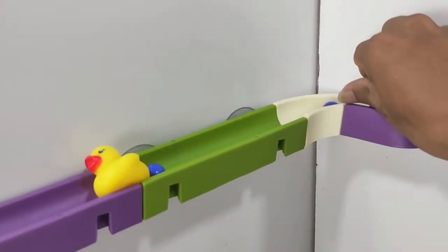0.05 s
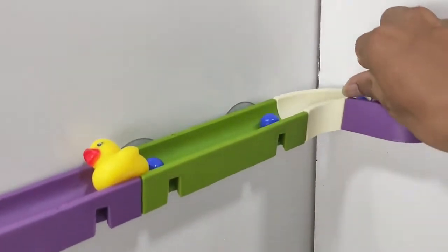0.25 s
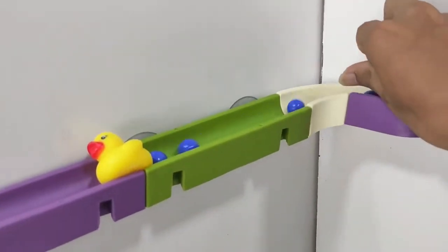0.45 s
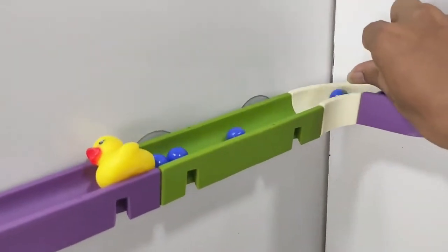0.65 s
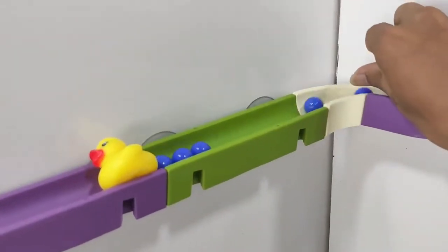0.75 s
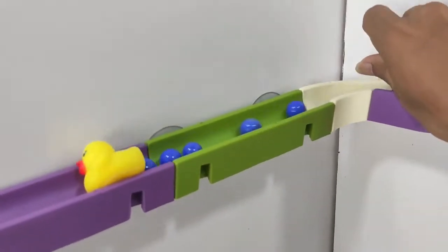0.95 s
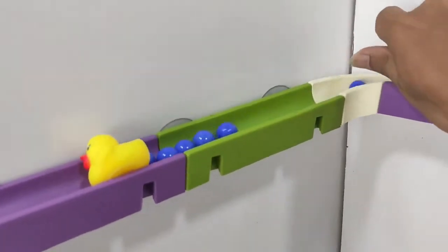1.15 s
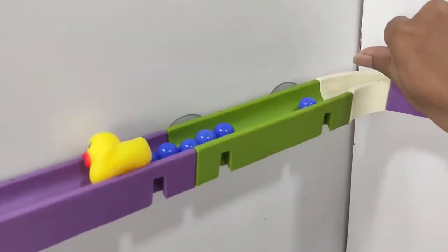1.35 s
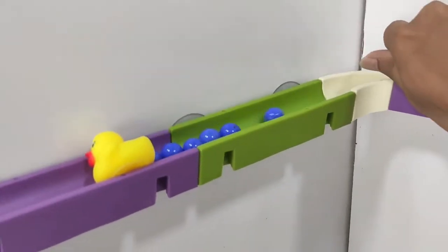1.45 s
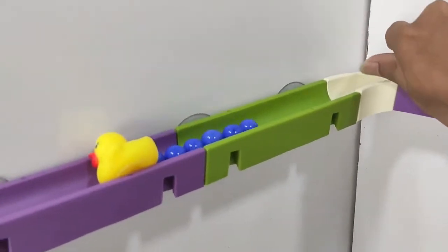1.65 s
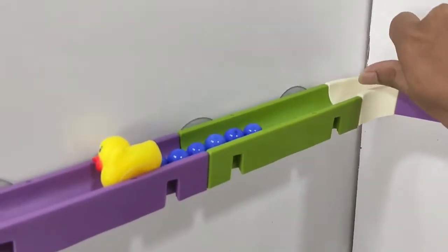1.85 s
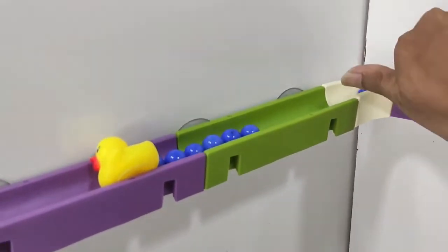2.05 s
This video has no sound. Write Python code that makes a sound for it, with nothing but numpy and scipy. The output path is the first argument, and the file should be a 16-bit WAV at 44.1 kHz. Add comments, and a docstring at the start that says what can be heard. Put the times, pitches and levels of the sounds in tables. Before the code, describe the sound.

Marbles rumble along a plastic chute and click against each other, with a short indoor echo.

```python
"""In a small, hard room, glass marbles run one by one down a plastic toy track stuck to a wall.
Over a low hum, they rumble along the chute, clack against the marbles waiting behind a toy duck
and knock into the bend, which makes the plastic ring. Early on the track groans under a hand;
later the row of marbles shoves the duck with a soft thud. The room echoes each knock and clack."""
import sys
import numpy as np
from scipy import signal
from scipy.fft import rfft, irfft, next_fast_len
from scipy.io import wavfile
from scipy.ndimage import map_coordinates

SR = 44100
rng = np.random.default_rng(int(sys.argv[2]) if len(sys.argv) > 2 else 0)


def master_out(mix):
    """Clip the mix to full scale and print it as 16-bit PCM to the path in sys.argv[1]."""
    frames = np.transpose(np.atleast_2d(mix))
    ceiling = np.clip(frames, -1, 1)
    pcm = np.round(ceiling * 32767).astype(np.int16)
    wavfile.write(sys.argv[1], SR, pcm)


N = 92610
TIME = np.arange(N) / SR  # seconds into the scene
HIT_TIME = np.arange(SR * 3 // 4) / SR  # seconds since a hit


def amp(db):
    return 10 ** (np.asarray(db) / 20)


def unit_rms(x):
    return x / np.sqrt(np.mean(x ** 2) + 1e-20)


def unit_energy(x):
    return unit_rms(x) / np.sqrt(x.shape[-1])


def along(points, hz):
    """Read a curve of (Hz, value) points, with octaves evenly spaced."""
    point_hz, values = np.transpose(points)
    return np.interp(np.log(hz + 1), np.log(point_hz + 1), values)


def bell(hz, centre_hz, width_hz):
    """A resonance: a hump of height 1 around one pitch."""
    return 1 / (1 + ((hz - centre_hz) / width_hz) ** 2)


def add(out, start_s, x):
    """Mix x into out at a given time."""
    i = max(round(start_s * SR), 0)
    out[:, i:i + x.shape[1]] += x[:, :N - i]


def coloured(x, gain_db):
    """Turn each frequency of x up or down by gain_db(Hz)."""
    size = 2 * next_fast_len(x.shape[-1] // 2 + 2048)
    cepstrum = irfft(np.log(amp(gain_db(np.fft.rfftfreq(size, 1 / SR)))), size)
    cepstrum[..., 1:size // 2] *= 2  # folded so that nothing rings before a hit
    cepstrum[..., size // 2 + 1:] = 0
    return irfft(rfft(x, size) * np.exp(rfft(cepstrum)), size)[..., :x.shape[-1]]


def paired(x):
    """Blend two unrelated signals as two close microphones hear them: alike in the bass."""
    # How alike left and right are. Each row: frequency in Hz, likeness (1 is identical).
    likeness = [(100, 0.91), (350, 0.79), (700, 0.7), (1300, 0.06), (4000, 0.037)]
    hz = np.fft.rfftfreq(x.shape[1], 1 / SR)
    angle = np.arccos(np.clip(along(likeness, hz), -1, 1)) / 2
    mid, side = irfft(rfft(x) * [np.cos(angle), np.sin(angle)], x.shape[1])
    return np.array([mid + side, mid - side])


def noise(samples=len(HIT_TIME)):
    return paired(rng.standard_normal((2, samples)))


def wobble(per_s):
    """A smooth curve through per_s random values a second."""
    return map_coordinates(rng.standard_normal(int(N * per_s / SR) + 4), [TIME * per_s])


def room_tone():
    """Low, steady noise with a wavering hum."""
    # The background noise. Each row: frequency in Hz, gain in dB.
    air_colour = [(40, -36), (62, -3), (110, -1), (180, 0), (300, -8), (700, -7), (1500, -15),
                  (3000, -29.5), (8000, -36), (15000, -48)]
    # The tones of the hum. Each row: pitch in Hz, level in dB.
    hum_tones = [(82, -52.5), (112, -53.5), (146.5, -51)]
    air = unit_rms(coloured(noise(N), lambda hz: along(air_colour, hz)))
    hum = sum(amp(db + 2.8 * wobble(4.59)) * np.sqrt(2)
              * np.sin(2 * np.pi * hz * TIME + 0.62 * wobble(4.1)) for hz, db in hum_tones)
    return amp(-43.5) * air + hum


def rolling():
    """Tiny bumps shake the track and fill the room; the ringing shifts as the marbles travel."""
    # The rumble's loudness. Each row: time in seconds, level in dB.
    loudness = [(0, -32.5), (.1, -43), (.22, -46.5), (.3, -29), (.46, -34.5), (.56, -30.5), (.7, -33),
                (.85, -31), (1.0, -30), (1.35, -32.5), (1.5, -41), (1.61, -36), (1.72, -49.5),
                (1.85, -36.5), (2.1, -44.5)]
    # The tone of the chute. Each row: frequency in Hz, gain in dB.
    chute_colour = [(80, -13.5), (280, -11.5), (380, 2), (490, -6.5), (700, -1.5), (950, -0.5), (1400, 2.5),
                    (2200, -11), (4000, -10.5), (6500, -23.5), (10000, -20.5), (15000, -49)]
    # Soft rolling stirs mainly the track's low notes. Each row: frequency in Hz, gain in dB.
    ring_tilt = [(420, -1), (700, -4.5), (1500, -6), (2400, -16)]
    bumps_per_s, spread_db, echo_db = 400, 5.5, -1
    bumps = (rng.random((2, N)) < bumps_per_s / SR) * np.sign(rng.standard_normal((2, N)))
    bumps *= amp(spread_db * np.minimum(rng.standard_normal((2, N)), 2))
    shake = lambda response: signal.fftconvolve(bumps[:1], response, axes=1)[:, :N]
    rumble = paired(bumps) + amp(echo_db) * shake(room_echo())
    rumble = unit_rms(coloured(rumble, lambda hz: along(chute_colour, hz)))
    places = np.array([wobble(10) for _ in range(3)])  # drifting shares of three spots on the track
    ring = sum(share * shake(track_ring()) for share in places / np.linalg.norm(places, axis=0))
    ring = unit_rms(coloured(ring, lambda hz: along(ring_tilt, hz)))
    level_db = np.interp(TIME, *np.transpose(loudness)) + wobble(38.16)
    return amp(level_db) * unit_rms(rumble + ring)


def room_echo():
    """The hard walls throw sound back; the treble dies first."""
    # The echo's length. Each row: frequency in Hz, seconds to fade by 60 dB.
    fade_times = [(150, 0.56), (500, 0.54), (1400, 0.52), (3700, 0.46), (9000, 0.4), (15000, 0.31)]
    hz, t, spectrum = signal.stft(rng.standard_normal((2, len(HIT_TIME))), SR, nperseg=256)
    fade = amp(-60 * t / along(fade_times, hz)[:, None])
    tail = signal.istft(spectrum * fade, SR, nperseg=256)[1][:, :len(HIT_TIME)]
    build_up = 1 - np.exp(-HIT_TIME / 0.0039)
    return unit_energy(paired(tail) * build_up)


def track_ring():
    """The track rings at its own notes, in a new balance for each spot touched."""
    # The track's notes. Each row: pitch in Hz, relative level in dB, seconds to fade by 60 dB.
    notes = [(349.8, -1.5, 0.24), (425.3, -1, 0.16), (574, 0, 0.13), (723, 1, 0.22), (789, -4.5, 0.14),
             (1208, 3.5, 0.24), (1233, 3, 0.099), (1408, -0.5, 0.14), (1482, 4, 0.078), (1638, 7.5, 0.15),
             (2000, -4, 0.28), (2318, 1.5, 0.12), (2348, 5, 0.19), (2626, -10, 0.51)]
    scatter_db = 1.8
    ring = sum(amp(db + scatter_db * rng.standard_normal() - 60 * HIT_TIME / fade_s)
               * np.sin(2 * np.pi * (hz * HIT_TIME + rng.random((2, 1)))) for hz, db, fade_s in notes)
    return unit_energy(paired(ring))


def contact(burst, colour_db, left_db, echo_db):
    """One hit: a filtered burst, placed left or right, and its duller echo."""
    # The walls swallow the highest treble. Each row: frequency in Hz, gain in dB.
    dulling = [(9000, -0.5), (12000, 0.5), (15500, -5.5)]
    direct = unit_energy(coloured(burst, colour_db) * amp([[left_db / 2], [-left_db / 2]]))
    echo = unit_energy(coloured(room_echo(), lambda hz: colour_db(hz) + along(dulling, hz)))
    return direct + amp(echo_db) * echo


def clacks():
    """Glass meets glass: a sharp click with a tiny ping that runs through the row of marbles."""
    # Marble hits marble. Each row: start in seconds, relative level in dB, seconds before fading,
    # ping pitch in Hz, boost at that pitch in dB, left over right in dB.
    hits = [(.008, -24, 0.0003, 8270, 3.5, -2), (0.5778, -13, 0.0018, 8470, 7.5, -7),
            (0.8393, -11, 0.001, 8950, 8, -14), (0.8411, -17, 0.0023, 9200, 4, -12),
            (1.1, -26, 0.0018, 8740, 13, -3), (1.118, -25, 0.0013, 8800, 7, -3),
            (1.1743, -6, 0.0016, 9120, 5.5, -6), (1.2629, -10.5, 0.00053, 8900, 10.5, -17),
            (1.264, -5.5, .0018, 8820, 9.5, -1.5), (1.6256, -9, 0.00094, 8360, 7, -1)]
    # The tone of glass. Each row: frequency in Hz, gain in dB.
    glass = [(200, -7), (400, -14.5), (1400, -7.5), (3000, -14), (5000, -3), (6600, -1.5), (9500, 2),
             (12000, -1), (15000, -15)]
    ping_db, fade_s = -9, 0.003
    out = np.zeros((2, N))
    for start_s, db, hold_s, ping_hz, boost_db, left_db in hits:
        ping = np.sqrt(2) * np.sin(2 * np.pi * ping_hz * HIT_TIME + np.array([[np.pi / 2], [0]]))
        fade = amp(-60 * np.maximum(HIT_TIME - hold_s, 0) / fade_s)
        burst = (noise() + amp(ping_db) * ping) * fade
        colour = lambda hz: along(glass, hz) + boost_db * bell(hz, ping_hz, width_hz=480)
        add(out, start_s, 10 * amp(db) * contact(burst, colour, left_db, echo_db=-3.5))
    return out


def knocks():
    """A marble strikes plastic: a snap, a rattle that differs from spot to spot, and the track's ring."""
    # Marble hits track. Each row: start in seconds, relative level in dB, treble in dB, body in dB,
    # thin side wall's pitch in Hz, boost at that pitch in dB, ring and echo in dB, left over right in dB.
    hits = [(.081, -24, -18, 1.5, 3240, 1.5, -3.5, -6), (.134, -33, 13, 7, 4000, 0, 1.5, -16),
            (0.2388, -10.5, 7.5, 2, 4470, 2, 0.5, 0.5), (.2524, -8, 3.5, 3.5, 3220, -5, -2.5, -2),
            (.304, -13.5, -1.5, -17, 3570, 2, .5, -1), (0.3324, -12.5, -2, 3, 3940, 9.5, -2, 2),
            (0.3408, -9, -5, -3, 3860, 12.5, -10.5, 0), (.487, -22.5, -12.5, 2.5, 3400, -25, 1, 0),
            (.505, -21, -9, -1, 3420, -24, -4.5, -8), (.577, -17.5, 0, 4, 2380, -0.5, -7.5, -1),
            (0.6367, -7.5, -5.5, -3.5, 3300, 3, 0, 2.5), (0.6803, -12, 7, 1, 4270, 2, -.5, -2.5),
            (.718, -13.5, -2.5, 1, 4160, 3, -1.5, -6), (.885, -18, -9, 7.5, 3500, -5, -4, 2.5),
            (0.993, -20, -31, 5, 3500, -15, -1, -2), (1.013, -18.5, -15, 8, 4140, 8, -6.5, 0),
            (1.07, -27.5, -10, -16, 3350, -11, 3, -5), (1.084, -18.5, -13, 4, 3180, -12, 0, -4),
            (1.339, -25.5, -21, 3, 3700, 4, 3, 3), (1.366, -18.5, 6.5, 10, 3950, 12, -6, -.5),
            (1.577, -31.5, -3, 6, 3600, 1, 1, 1), (1.762, -15.5, -4.5, -5, 3500, 5.5, -5.5, -4),
            (1.7875, -7.5, 0, -2, 3850, 5.5, 0, 2.5)]
    # The tone of the plastic shell. Each row: frequency in Hz, gain in dB.
    plastic = [(60, -29), (220, -5.5), (360, -3.5), (800, -1.5), (1450, 2.5), (2500, -1), (4200, -3.5),
               (6300, -10.5), (7700, -14), (9200, -7.5), (12000, -10.5), (15000, -24)]
    fade_s, snap_height, ring_db = 0.021, 4.7, -3
    shell_hz = np.arange(0, SR / 2, 170)  # the shell has a random peak or dip at each of these
    out = np.zeros((2, N))
    for start_s, db, treble_db, body_db, wall_hz, wall_db, after_db, left_db in hits:
        burst = noise() * amp(-60 * HIT_TIME / fade_s)
        burst[[0, 1], [4, 0]] += snap_height  # reaches the left side 4 samples late
        ripple_db = 2.5 * np.sign(rng.standard_normal(len(shell_hz)))
        colour = lambda hz: (along(plastic, hz)
                             + along([(250, 0), (800, body_db), (3000, 0), (8500, treble_db)], hz)
                             + wall_db * bell(hz, wall_hz, width_hz=500)
                             + np.interp(hz, shell_hz, ripple_db))
        ring = amp(ring_db + after_db) * track_ring()
        add(out, start_s, 10 * amp(db) * (contact(burst, colour, left_db, echo_db=after_db) + ring))
    return out


def track_groan():
    """The track flexes under the hand: a low tone that swells quickly and fades."""
    start_s, length_s, pitch_hz, level_db = 0.11, 0.19, 109.1, -40
    progress = np.clip((TIME - start_s) / length_s, 0, 1)
    swell = np.sin(np.pi * progress ** 0.36)
    tone = np.sqrt(2) * np.sin(2 * np.pi * pitch_hz * TIME + 0.52 * wobble(25))
    return amp(level_db) * swell * tone


def duck_thud():
    """The row of marbles shoves the toy duck: a soft, low bump."""
    start_s, level_db, rise_s, fade_s = 1.172, -29.5, 0.0033, 0.079
    colour = lambda hz: 40 * np.log10(bell(hz, centre_hz=230, width_hz=110) + 0.001)
    low_noise = unit_rms(coloured(noise(), colour))
    envelope = amp(level_db - 60 * HIT_TIME / fade_s) * (1 - np.exp(-HIT_TIME / rise_s))
    out = np.zeros((2, N))
    add(out, start_s, low_noise * envelope)
    return out


def scene():
    return room_tone() + rolling() + clacks() + knocks() + track_groan() + duck_thud()


def record(dry):
    """Each microphone has its own tone; the tallest peaks are rounded and the very top is cut off."""
    # The balance of the microphones. Each row: frequency in Hz, left over right in dB.
    balance = [(300, 0), (600, 1.5), (1200, -2.5), (2200, -0.5), (4500, 0.5), (8500, -5), (13000, 9)]
    ceiling, hardness, top_hz = 1.14, 2.3, 15800
    heard = coloured(dry, lambda hz: along(balance, hz) * np.array([[0.5], [-0.5]]))
    rounded = heard / (1 + np.abs(heard / ceiling) ** hardness) ** (1 / hardness)
    below_top = np.fft.rfftfreq(2 * N, 1 / SR) < top_hz
    return irfft(rfft(rounded, 2 * N) * below_top)[:, :N]


dry = scene()
out = record(dry)
master_out(out)
```